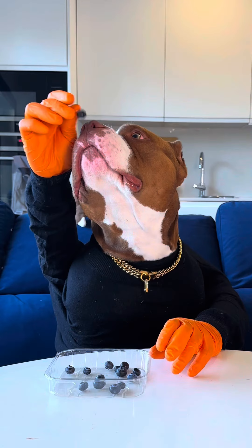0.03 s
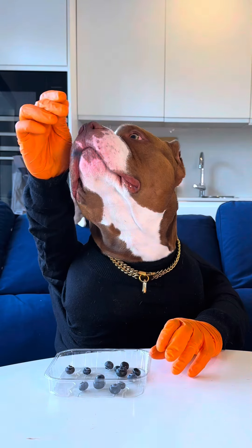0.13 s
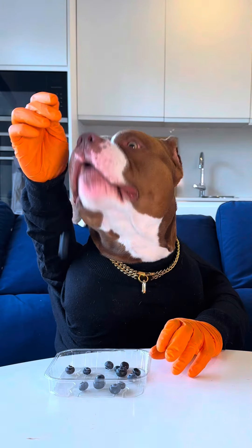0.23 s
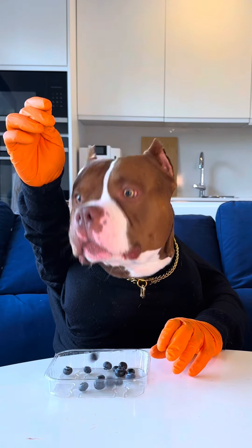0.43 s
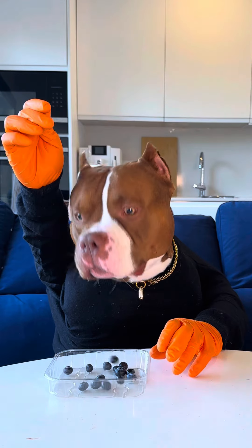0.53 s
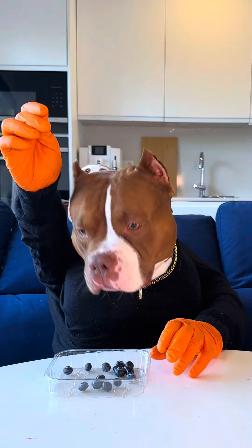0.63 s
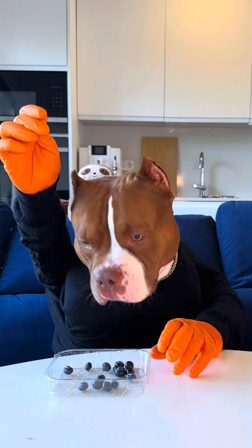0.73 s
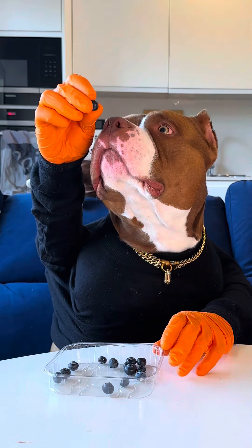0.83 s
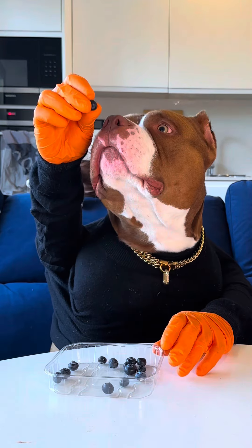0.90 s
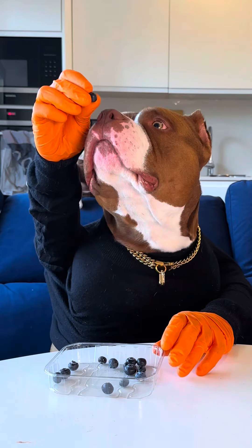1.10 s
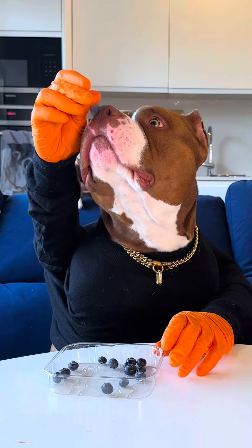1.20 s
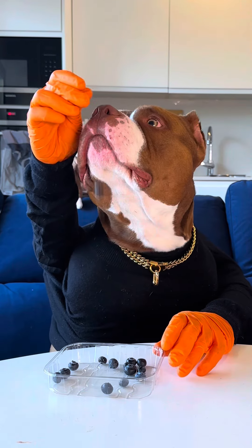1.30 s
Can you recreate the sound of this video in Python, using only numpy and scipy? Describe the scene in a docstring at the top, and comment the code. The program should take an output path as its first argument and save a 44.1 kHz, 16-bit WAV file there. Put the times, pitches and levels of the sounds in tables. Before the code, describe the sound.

A sharp snap of a dog's teeth rings briefly in a hard-walled kitchen. Small saliva clicks come before it, fading wet jowl slaps follow, and later the lips quietly part again over a faint low hum.

```python
"""A hard-walled kitchen with a low hum, where a big, loose-lipped dog snaps a blueberry out of the air.
Its wet lips peel apart: films of saliva click and fizz, and air pops into the opening mouth.
The teeth clack shut and ring the jaws, then the jowls slap a few times as the head drops.
The room rings on; a second later the mouth opens again."""
import sys
import numpy as np
from scipy import signal
from scipy.fft import rfft, irfft
from scipy.io import wavfile

SR = 44100
rng = np.random.default_rng(int(sys.argv[2]) if len(sys.argv) > 2 else 0)


def inscribe(sig):
    """Save sig as 16-bit PCM at rate SR to the path in sys.argv[1].

    A 1-D sig is mono; a 2-D sig holds one channel per row.
    Samples are clipped to [-1, 1] before scaling.
    """
    pcm = np.round(np.clip(np.atleast_2d(sig).T, -1, 1) * 32767)
    wavfile.write(sys.argv[1], SR, pcm.astype(np.int16))


N = 59535


def amp(db):
    """Decibels to gain."""
    return 10 ** (np.asarray(db) / 20)


def unit_energy(x):
    """Scales a sound to an energy of one."""
    return x / np.sqrt(np.sum(x ** 2) + 1e-20)


def curve_at(points, hz):
    """Reads a curve along a log-frequency axis."""
    freqs, values = np.transpose(points)
    return np.interp(np.log(hz + 1), np.log(freqs + 1), values)


def add(mix, start_s, sound):
    """Drops a sound into the mix at its cue."""
    part = mix[max(round(start_s * SR), 0):][:len(sound)]
    part += sound[:len(part)]


def equalise(x, eq, size=4096):
    """Minimum-phase EQ: nothing rings ahead of an attack."""
    log_gain = np.log(amp(curve_at(eq, abs(np.fft.fftfreq(size, 1 / SR)))))
    response = np.exp(np.conj(signal.hilbert(log_gain)))
    taps = np.fft.ifft(response).real[:size // 2]
    return signal.fftconvolve(x, taps)[:len(x)]


def ring(modes, attack_s=0.00018):
    """Struck modes: dying sines with a slightly soft attack."""
    t = np.arange(N) / SR
    sines = sum(amp(db - 60 * t / t60) * np.sin(2 * np.pi * hz * t) for hz, db, t60 in modes)
    return np.minimum(t / attack_s, 1) * sines


def burst(decay_s, hold_s=0., attack_s=0.00022, size=4096, flatten_passes=4):
    """A short spray of tiny contacts; each flattening pass evens out its spectrum."""
    t = np.arange(size) / SR
    envelope = np.minimum(t / attack_s, 1) * np.exp(-np.maximum(t - hold_s - attack_s, 0) / decay_s)
    spray = envelope * rng.standard_normal(size)
    for _ in range(flatten_passes):
        flat = irfft(np.exp(1j * np.angle(rfft(spray))))
        spray = flat * envelope ** .5
    return unit_energy(spray)


def resonate(x, hz, width_hz):
    """A band-pass resonance on a steady or gliding pitch."""
    carrier = np.exp(2j * np.pi * np.cumsum(hz * np.ones(len(x))) / SR)
    pole = np.exp(-np.pi * width_hz / SR)
    baseband = signal.lfilter([1 - pole], [1, -pole], x / carrier)
    baseband = signal.lfilter([1 - pole], [1, -pole], baseband + 1e-18)
    return unit_energy((carrier * baseband).real)


# Colour of the room tone (frequency [Hz], relative level [dB])
ROOM_TONE_EQ = [(20, -25), (45, -15.5), (80, -10.5), (125, -3), (170, -10.5), (225, -7.5), (340, -9.5),
                (450, -12.5), (650, -12.5), (1000, -17.5), (1300, -21.5), (1700, -28), (3000, -31.5),
                (6000, -37), (10000, -44), (15000, -46.5), (16000, -61.5)]


def room_tone(level_db=-62.5):
    """The bed: steady noise shaped into a low hum and a faint hiss."""
    gain = amp(curve_at(ROOM_TONE_EQ, np.fft.rfftfreq(N, 1 / SR)))
    noise = irfft(rfft(rng.standard_normal(N)) * gain, N)
    return amp(level_db) * noise / noise.std()


# Early reflections off table and cupboards (delay [s], level [dB])
REFLECTIONS = [(.0032, -4.5), (.0078, -7), (0.01, -16.5), (0.0137, -7.5), (0.018, -20), (0.0272, -23)]
# Colour of the reverb tail (frequency [Hz], level [dB])
TAIL_EQ = [(60, -14), (140, -10), (300, -9.5), (420, -9.5), (600, -4.5), (1050, -3.5), (1500, -5.5),
           (2100, -6.5), (2750, -6.5), (3250, 1.5), (3750, -6), (4500, -3), (6000, -8), (8000, -7.5),
           (11000, -7), (15000, -7)]
# Length of the reverb tail (frequency [Hz], T60 [s])
TAIL_DECAY = [(100, 0.63), (300, 0.67), (1000, 0.55), (3200, 0.49), (6000, .55), (10000, 0.16),
              (16000, 0.31)]
# Standing waves between the walls (frequency [Hz], level [dB], T60 [s])
STANDING_WAVES = [(144.4, -61.5, .7), (316, -57, 0.27), (820, -54, 0.32), (968, -58, 0.28),
                  (1152, -61, 0.39)]


def kitchen_reverb(sound, early_db, tail_db, predelay_s=0.008, fade_in_s=0.0056):
    """Hard surfaces add early reflections, standing waves and a diffuse tail that dies band by band."""
    early = np.zeros(N)
    for delay_s, db in REFLECTIONS:
        add(early, delay_s, amp([db]))
    early = equalise(early, [(200, -6.5), (1500, -3.5), (3500, -2), (10000, -7)])
    hz, t, bands = signal.stft(rng.choice([-1., 1.], N), SR, nperseg=256)
    decay = amp(-60 * t / curve_at(TAIL_DECAY, hz)[:, None])
    band_energy = N * np.mean(decay ** 2, axis=1, keepdims=True)
    band_gain = amp(curve_at(TAIL_EQ, hz))[:, None] / np.sqrt(band_energy)
    tail = signal.istft(bands * decay * band_gain, SR, nperseg=256)[1][:N]
    tail *= np.clip((np.arange(N) / SR - predelay_s) / fade_in_s, 0, 1)
    response = amp(early_db) * early + amp(tail_db) * (tail + ring(STANDING_WAVES))
    return sound + signal.fftconvolve(sound, response)[:N]


# Saliva clicks as the lips part (time [s], level [dB], pitch [Hz], decay [s])
SALIVA_CLICKS = [(.0948, -27.5, 3700, 0.0014), (0.1171, -38, 4400, 0.0017), (0.1223, -32, 4500, .004),
                 (.1305, -36, 3900, 0.002), (.1392, -41, 4000, 0.0029), (0.1426, -29.5, 5100, 0.00089),
                 (.1598, -27, 4200, 0.0038), (.177, -36.5, 5754, 0.0034), (1.258, -37.5, 4670, 0.00041),
                 (1.2685, -43, 5800, 0.0012), (1.2725, -35, 4650, 0.0056), (1.281, -32, 4500, 0.0025),
                 (1.3169, -34, 4040, 0.0027), (1.3384, -34.5, 4100, 0.0044)]
# Lips peeling apart in a fine fizz (time [s], level [dB], hold [s])
LIP_PEELS = [(0.036, -38, 0.036), (0.121, -25, 0.025), (0.158, -29.5, 0.006), (1.265, -32, .008),
             (1.277, -26, 0.01)]
# Wet colour of clicks and peels (frequency [Hz], level [dB])
WET_EQ = [(200, -3.5), (500, 3.5), (1500, 1.5), (2300, -4.5), (3200, 1), (5000, 0), (7000, -5),
          (10000, -17), (13000, -26), (16000, -41)]
# Pops of air passing the lips (time [s], level [dB], starting pitch [Hz], decay [s])
AIR_POPS = [(.1305, -26, 500, .002), (.14, -27.5, 940, 0.0058), (.1568, -25, 650, .002),
            (.1585, -22.5, 1150, .004), (.171, -29, 1480, .007), (0.2579, -4.5, 1050, 0.002),
            (1.274, -36, 480, 0.0052), (1.2817, -21.5, 695, 0.0033), (1.299, -29, 777, 0.012),
            (1.313, -32, 870, 0.013)]
# Fleshy colour of the pops' body, shared with the jowl smacks (frequency [Hz], level [dB])
FLESH_EQ = [(80, -25.5), (250, 1), (600, 3.5), (1200, 4.5), (2000, -4), (4000, -16.5), (12000, -38)]


def lips(click_width_hz=1400, crackle_db=3.5, pop_width_hz=270, pop_rise_per_s=21):
    """Saliva films break in clicks and fizz; air pops into a mouth whose pitch rises as it opens."""
    out = np.zeros(N)
    for start_s, db, hz, decay_s in SALIVA_CLICKS:
        click = resonate(burst(decay_s, hold_s=.001), hz, click_width_hz)
        add(out, start_s, amp(db) * unit_energy(equalise(click, WET_EQ)))
    for start_s, db, hold_s in LIP_PEELS:
        fizz = burst(decay_s=.003, hold_s=hold_s, flatten_passes=0)
        fizz *= amp(crackle_db * np.minimum(rng.exponential(1, len(fizz)), 5))  # uneven grains
        add(out, start_s, amp(db) * unit_energy(equalise(fizz, WET_EQ)))
    for start_s, db, start_hz, decay_s in AIR_POPS:
        puff = burst(decay_s, attack_s=0.0008)
        hz = start_hz * (1 + pop_rise_per_s * np.arange(len(puff)) / SR)
        cavity = resonate(puff, hz, pop_width_hz)
        overtone = amp(-17) * resonate(puff, hz * 3.2, pop_width_hz)
        body = amp(-2.5) * unit_energy(equalise(burst(decay_s), FLESH_EQ))
        add(out, start_s, amp(db) * (cavity + overtone + body))
    return out


# Jowl slaps (time [s], crack level [dB], smack level [dB], thud level [dB], decay [s])
JOWL_SLAPS = [(.2983, -6.5, -11, -33.5, 0.0019), (.3488, -20, -22.5, -37.5, 0.008),
              (0.3739, -10.5, -15.5, -38.5, 0.001833), (0.38, -24, -19.5, -32.5, 0.00078),
              (0.4383, -28, -20.5, -40, 0.0025), (0.4567, -20, -36, -66, .0025),
              (.487, -23, -26.5, -39.5, 0.0026), (0.5041, -23, -21.5, -44, 0.0029),
              (0.5495, -32, -42, -44.5, 0.006)]
# Bright, wet edge of a slap (frequency [Hz], level [dB])
CRACK_EQ = [(200, -31), (1000, -2), (1800, 5.5), (3000, 9.5), (4500, 5), (7000, 1.5), (9500, -7.5),
            (12000, -22.5), (14000, -30), (16000, -37)]
# Low ring of the soft cheeks (frequency [Hz], level [dB], T60 [s])
CHEEK_MODES = [(218, -5.5, 0.11), (300, -13.5, 0.19), (342, -6, 0.082)]


def jowls():
    """Loose jowls slap in three layers: a wet crack, a fleshy smack and a thud of the cheeks."""
    out, thud = np.zeros(N), ring(CHEEK_MODES)
    for start_s, crack_db, smack_db, thud_db, decay_s in JOWL_SLAPS:
        crack = equalise(burst(decay_s, hold_s=0.00046, attack_s=0.00101), CRACK_EQ)
        smack = equalise(burst(decay_s, hold_s=0.00323, attack_s=0.00113), FLESH_EQ)
        add(out, start_s, amp(crack_db) * unit_energy(crack))
        add(out, start_s, amp(smack_db) * unit_energy(smack))
        add(out, start_s, amp(thud_db) * thud)
    return out


# Colour of the teeth's clack (frequency [Hz], level [dB])
TEETH_EQ = [(60, -30), (200, -20), (380, -10.5), (590, -9.5), (800, -9.5), (1400, -0.5), (2100, -11.5),
            (2900, -6.5), (3600, -13), (4300, -12), (5250, -19), (5900, -15), (7500, -24.5), (10000, -31),
            (13000, -37.5), (16000, -55)]
# Ring of jaws and mouth (frequency [Hz], level [dB], T60 [s])
JAW_MODES = [(141, -20.5, 0.047), (312.7, -35, .2), (383, -16, 0.013), (457.6, -24, 0.081),
             (702, -30, .035), (808, -24.5, .025), (1075, -18, .028), (1263, -24.5, .03),
             (1412, -15, 0.014), (2560, -13, 0.018), (2896, -30, 0.06), (4176, -26.5, 0.019),
             (5780, -23.5, .016), (6650, -33, .016)]


def jaw_snap(start_s=.2421, clack_db=6.5):
    """The main hit: the teeth meet over a few milliseconds and ring the jaws and mouth."""
    out = np.zeros(N)
    clack = equalise(burst(decay_s=0.0054, hold_s=0.0034, attack_s=0.0005), TEETH_EQ)
    add(out, start_s, amp(clack_db) * unit_energy(clack))
    add(out, start_s + .0005, ring(JAW_MODES))
    return out


def scene():
    """Snap, jowls and lips, each with its own reverb send, over the room tone in mono."""
    dog = kitchen_reverb(jaw_snap(), early_db=-5, tail_db=0.5)
    dog += kitchen_reverb(jowls(), early_db=-1, tail_db=1)
    dog += kitchen_reverb(lips(), early_db=-6, tail_db=-3)
    low_cut = signal.butter(6, 155, btype="high", fs=SR, output="sos")  # trims rumble and deep bass
    return (signal.sosfilt(low_cut, dog) + room_tone())[None]


def record(dry):
    """A steep high cut at 16 kHz on the whole mix."""
    high_cut = signal.firwin(255, 16000, window=("kaiser", 9), fs=SR)
    return signal.oaconvolve(dry, high_cut[None], "same")


dry = scene()
out = record(dry)
inscribe(out)
```